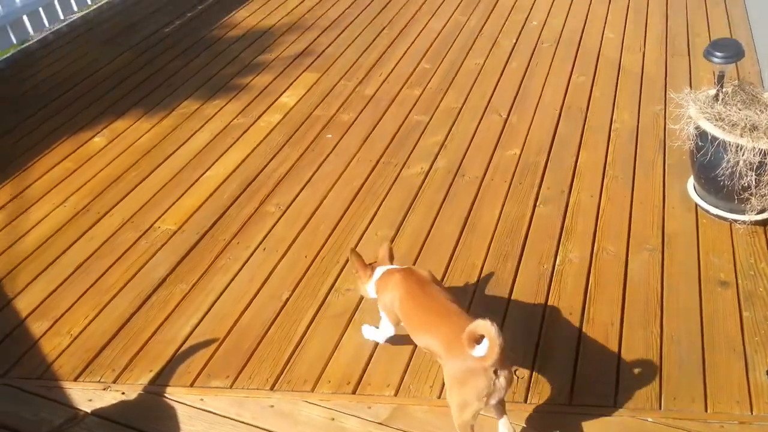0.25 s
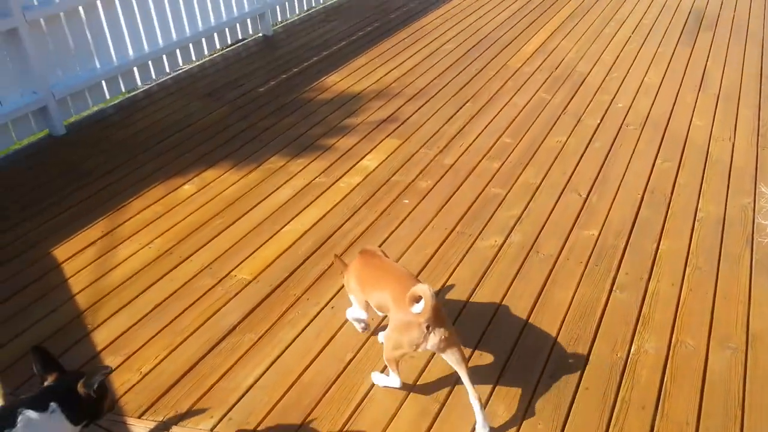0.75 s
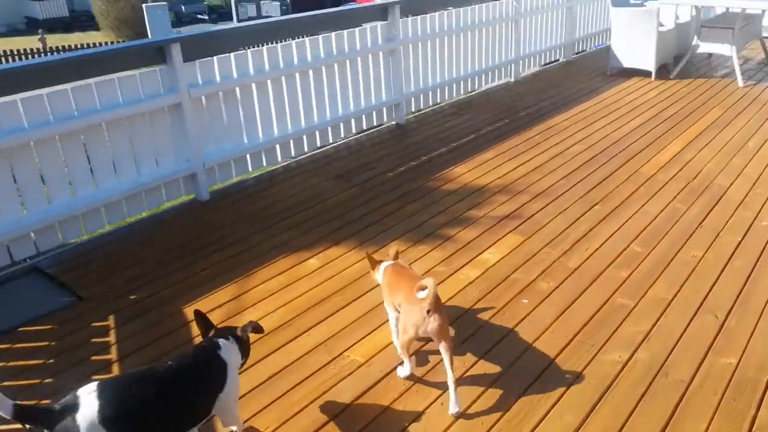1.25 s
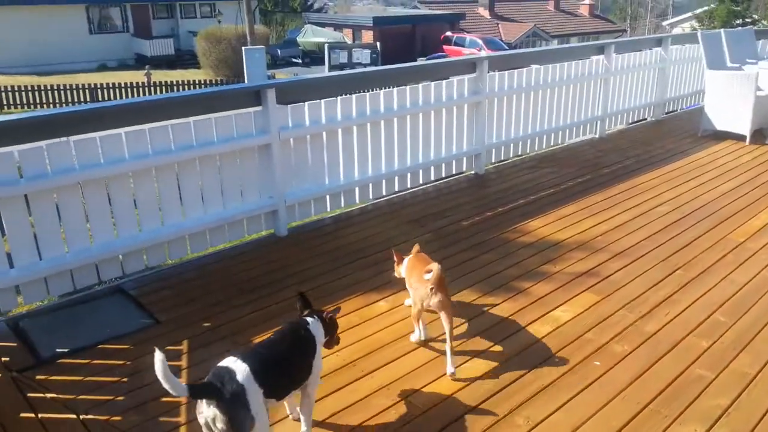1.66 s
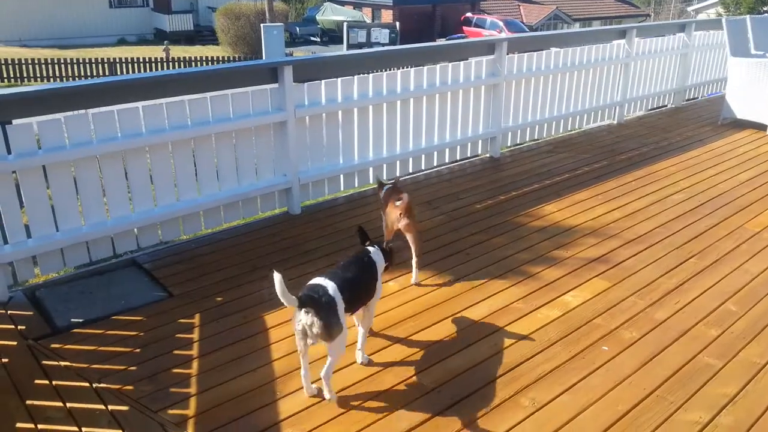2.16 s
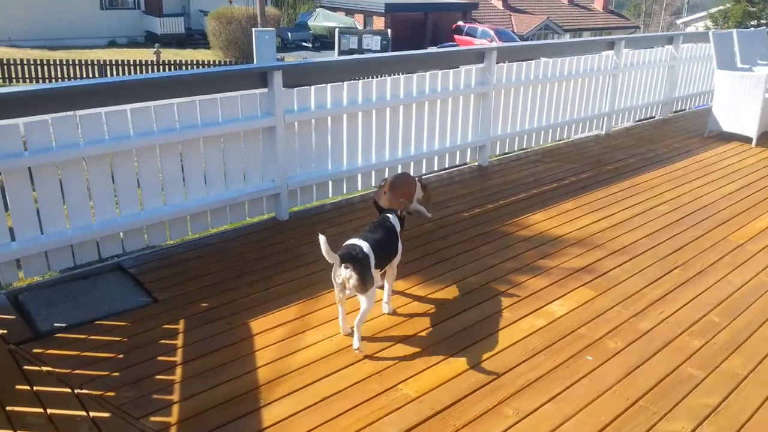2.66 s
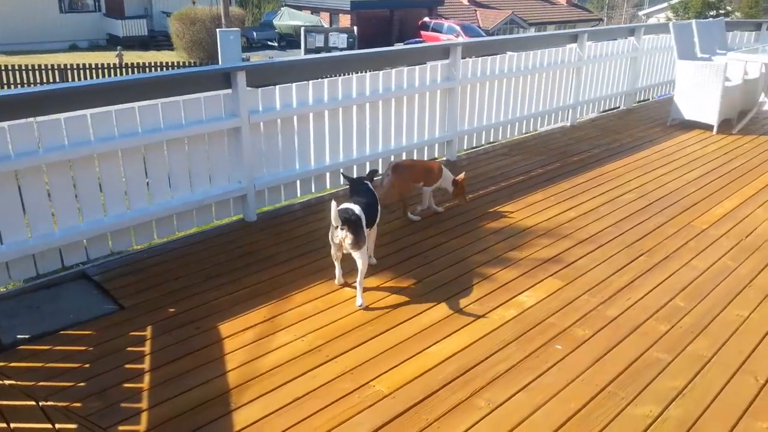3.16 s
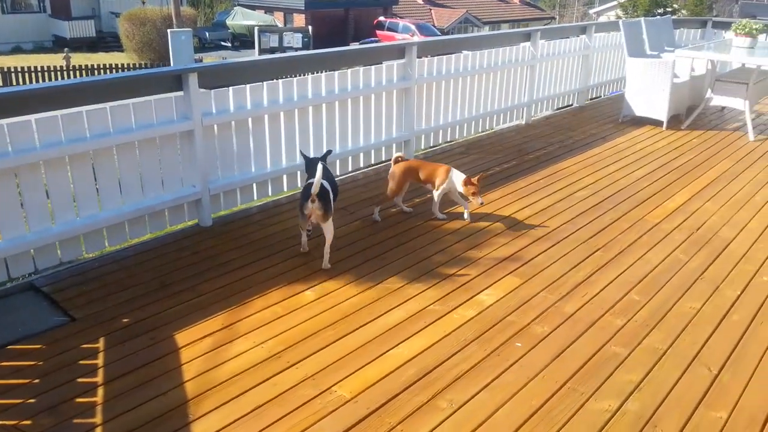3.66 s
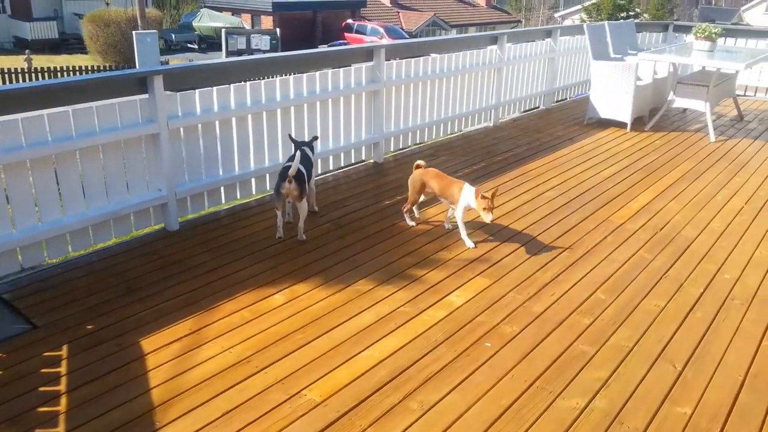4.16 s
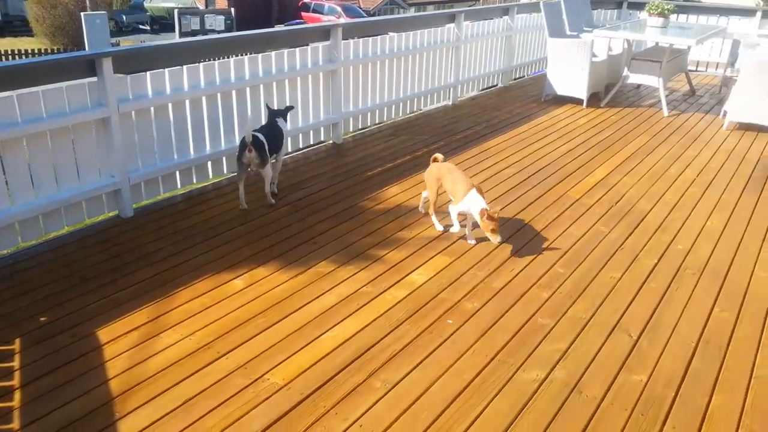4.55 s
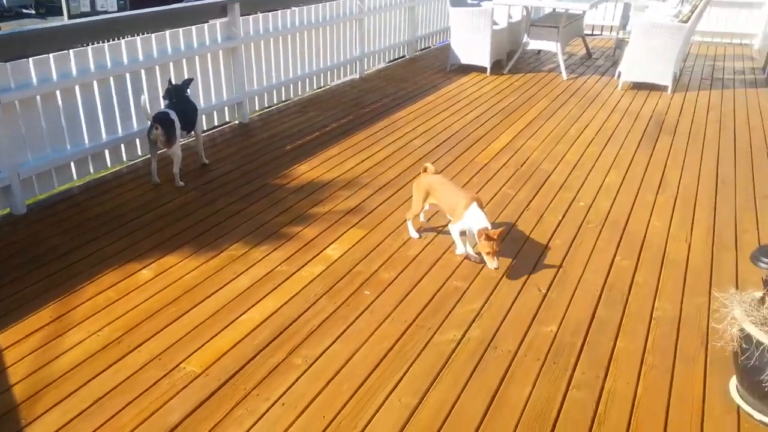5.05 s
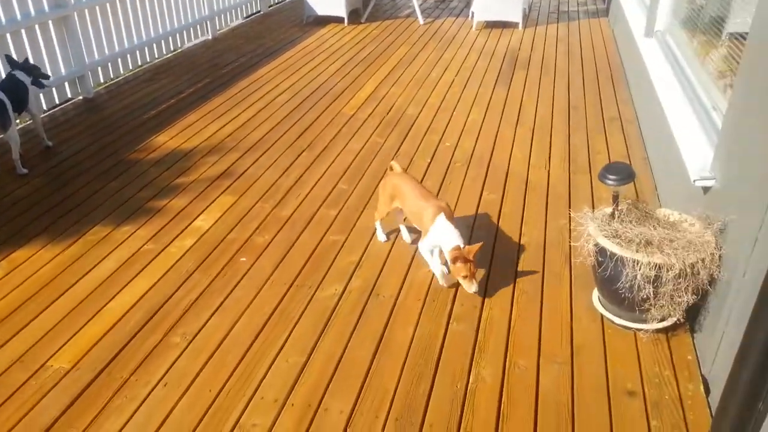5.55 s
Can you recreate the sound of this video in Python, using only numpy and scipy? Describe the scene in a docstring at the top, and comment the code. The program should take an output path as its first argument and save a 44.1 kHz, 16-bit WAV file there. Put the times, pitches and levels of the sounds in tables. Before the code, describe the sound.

Two small dogs walk on an outdoor wooden deck, their claws clicking irregularly with light scuffs and a few soft, hollow thuds. About halfway through, a gust of wind buffets the hand-held microphone. The steps grow sparser and fainter while a small bird quietly whistles a low and a high note in turn. Stronger gusts rumble near the end, over faint distant traffic and a motor hum.

```python
"""A soft puff of wind comes first, then the ticking claws of two small dogs on a wooden deck.
Their toes scuff and the boards knock, echoed briefly by wall and fence. Gusts buffet the hand-held
microphone, mostly its right port (sound opening). Later a small bird whistles two notes in turn.
Faint far traffic and a distant motor hum lie under it all."""
import sys
import numpy as np
from scipy import signal
from scipy.fft import rfft, irfft
from scipy.io import wavfile
from scipy.ndimage import uniform_filter1d

SR = 44100
rng = np.random.default_rng(int(sys.argv[2]) if len(sys.argv) > 2 else 0)


def digitize_waveform(pressure):
    """Quantize a signal to 16-bit integers and store it at the path in sys.argv[1].

    Rows of a 2-D input are taken as channels; values are limited to [-1, 1].
    """
    field = np.atleast_2d(pressure).T
    bounded = np.clip(field, -1, 1)
    quanta = np.round(bounded * 32767).astype(np.int16)
    wavfile.write(sys.argv[1], SR, quanta)


N = 255339
TIME = np.arange(N) / SR
PORT_LAG = 6  # samples by which the left port hears later


def undb(db):
    """Turn decibels into a gain to multiply by."""
    return 10 ** (np.asarray(db) / 20)


def curve(table):
    """Join the (time, value) points of a table into one value per sample."""
    return np.interp(TIME, *np.transpose(table))


def colour(x, points, size=4096):
    """Shape the tone through (f/Hz, level/dB) points; white noise keeps its power."""
    hz, db = np.transpose(points)
    f = np.maximum(np.arange(size // 2 + 1) * SR / size, 1)
    gain = undb(np.interp(np.log(f), np.log(hz), db))
    cepstrum = irfft(np.log(gain))
    cepstrum[1:size // 2] *= 2  # folded forward, so the filter never rings before a hit
    cepstrum[size // 2 + 1:] = 0
    response = irfft(np.exp(rfft(cepstrum)))
    return signal.fftconvolve(np.atleast_2d(x), response[None] / np.linalg.norm(response), axes=-1)[:, :N]


def noise(points):
    """Coloured noise, unrelated at the two ports."""
    return colour(rng.standard_normal((2, N)), points)


def wander(rate):
    """A smooth random wobble of size about 1, with `rate` new values a second."""
    k = int(SR / rate)
    stairs = np.repeat(rng.standard_normal(N // k + 1), k)
    return 1.228 * uniform_filter1d(uniform_filter1d(stairs, k), k)[:N]


def ports(pair, likeness):
    """The left port hears part of what the right one hears, a little later."""
    left = likeness * np.roll(pair[1], PORT_LAG) + np.sqrt(1 - likeness ** 2) * pair[0]
    return np.array([left, pair[1]])


def sides(pan_db):
    """Two gains of mean power 1; the first (left) is pan_db louder."""
    gains = undb(np.array([pan_db, -pan_db]) / 2)
    return (gains / np.sqrt(np.mean(gains ** 2, axis=0))).reshape(2, -1)


def add(out, s, sound):
    """Mix a stereo sound in at s seconds."""
    i = max(int(s * SR), 0)
    out[:, i:i + sound.shape[1]] += sound[:, :max(N - i, 0)]


def bump(t, rise_s, decay_s):
    """A level that grows to 1 at t = 0, then dies away."""
    return np.exp(-np.abs(t) / np.where(t < 0, rise_s, decay_s))


def echo(x, t60, delay):
    """Scattered reflections: few at first, then many, fading by 60 dB in t60 seconds."""
    t = np.arange(SR) / SR
    reflections = rng.standard_normal((2, SR)) * (rng.random((2, SR)) < .05 + 10 * t)
    response = reflections * np.exp(-np.log(1000) * t / t60) * (t > delay)
    response /= np.linalg.norm(response, axis=1, keepdims=True)
    return signal.fftconvolve(x, response, axes=-1)[:, :N]


# tone of the outdoor air: f/Hz, level/dB
AIR_TONE = [(59, -24.5), (100, -6), (317, -4), (367, -2), (425, -3.5), (492, -4.5), (660, -15),
            (885, -12.5), (1630, -32), (2990, -24.5), (12200, -21.5), (14100, -26), (15000, -41)]
# tone of the far traffic: f/Hz, level/dB
TRAFFIC_TONE = [(150, 2), (300, -6), (500, -5), (720, -4.5), (1020, 2.5), (1400, -5.5), (2200, -13),
                (5000, -29), (15000, -66)]
# how the traffic swells and fades: t/s, level/dB
TRAFFIC_LEVEL = [(0, -80.5), (1.2, -89), (2.4, -82.5), (3.3, -76), (4.2, -73.5), (5.1, -88.5), (5.79, -83)]
# the pitches in the motor's hum: f/Hz, level/dB
MOTOR_TONES = [(131.5, -80), (263.5, -78.5), (308, -80.5), (396, -84.5), (437, -78), (643, -95),
               (729, -90.5)]
def outdoors():
    """Still air hisses, far traffic murmurs and a motor hums at a wavering speed."""
    air = undb(-74) * ports(noise(AIR_TONE), likeness=0.78)
    traffic_db = curve(TRAFFIC_LEVEL) + 4.5 + 0.31 * wander(11)
    traffic = undb(traffic_db) * ports(noise(TRAFFIC_TONE), likeness=0.65)
    motor_time = np.cumsum(1 + 0.00716 * wander(8)) / SR
    hum = sum(undb(db + 2.85 * wander(8.4)) * np.sin(2 * np.pi * hz * motor_time)
              for hz, db in MOTOR_TONES)
    return air + traffic + hum * undb(-1)


# the bird's low and high note: length/s, rough start f/Hz, f/Hz it slides toward
BIRD_NOTES = [(0.13, 3530, 3425), (0.23, 5330, 4830)]
# the song, low and high in turn: t/s, level/dB
BIRD_SONG = [(3.44, -70), (3.761, -63), (4.18, -64.5), (4.452, -57.5), (4.855, -59.5), (5.141, -69)]
def bird(settle=0.32, rasp=0.5, rasp_fade=0.31, swell=1.1):
    """Whistled notes start raspy, swell and slide down, smeared by the gardens in between."""
    out, flutter = np.zeros((2, N)), wander(900)
    for k, (s, db) in enumerate(BIRD_SONG):
        length, start_hz, end_hz = BIRD_NOTES[k % 2]
        u = np.arange(int(length * SR)) / (length * SR)  # 0 to 1 through the note
        roughness = rasp * np.exp(-u / rasp_fade) * flutter[int(s * SR):][:len(u)]
        hz = end_hz + (start_hz - end_hz) * (np.exp(-u / settle) + roughness)
        loudness = np.abs(np.sin(np.pi * u ** swell)) ** 0.65
        note = np.sin(2 * np.pi * np.cumsum(hz) / SR) * loudness
        add(out, s, note * undb(db) * sides(pan_db=8))
    return undb(-1.5) * out + undb(-3.5) * echo(out, t60=.44, delay=.008)


# gusts of wind: t/s, time held/s, left level/dB, right level/dB
GUSTS = [(0.0, 0.13, -66, -61), (0.352, 0.31, -63, -55), (0.91, 0.02, -54, -65), (1.964, 0.091, -79, -63),
         (2.297, 0.32, -67.5, -70), (2.79, 0.077, -48.5, -42), (2.931, 0.11, -43.5, -35.5),
         (3.068, 0.0091, -47.5, -47), (3.145, 0.027, -56, -50.5), (4.5, 0.04, -58, -59),
         (4.544, 0.077, -41, -40), (4.685, 0.077, -44.5, -39), (4.84, 0.062, -50.5, -35),
         (5.297, 0.031, -49.5, -51.5), (5.394, 0.034, -40.5, -46), (5.494, 0.28, -49, -35.5),
         (5.689, 0.083, -46, -25.5)]
def gusts(rise_s, fall_s, lull_db=-72.5):
    """Wind level in dB at the two ports: each gust rises, holds and dies back into the lull."""
    power = undb(lull_db) ** 2
    for s, length, left_db, right_db in GUSTS:
        shape = np.exp(np.minimum((TIME - s) / rise_s, 0) + np.minimum((s + length - TIME) / fall_s, 0))
        power = power + (undb([[left_db], [right_db]]) * shape) ** 2
    return 10 * np.log10(power)


# tone of wind rustling about the deck: f/Hz, level/dB
RUSTLE_TONE = [(300, 13), (600, 9.5), (1500, 4.5), (3000, 1), (6000, -3), (9000, -3.5), (15000, -7.5)]
# tone of air rushing past the microphone's housing: f/Hz, level/dB
RUSH_TONE = [(200, -6), (450, 2.5), (720, -1.5), (1020, 2.5), (1400, -7), (2300, -10.5), (5000, -38),
             (15000, -59)]
def breeze():
    """Each gust rustles about the deck and rushes past the housing, swelling slowly."""
    force_db = gusts(rise_s=0.03, fall_s=0.086).mean(axis=0) + 42
    rustle_db = -65 + 0.39 * force_db + 1.6 * wander(22)
    rustle = undb(rustle_db) * ports(noise(RUSTLE_TONE), likeness=0.052) * sides(pan_db=0.5)
    rush_db = -65 + 0.66 * force_db + 2.8 * wander(14)
    return rustle + undb(rush_db) * ports(noise(RUSH_TONE), likeness=1)


# tone of the rumble in light wind: f/Hz, level/dB
LIGHT_WIND_TONE = [(20, -23.5), (45, -2.5), (75, 2.5), (130, -1), (185, -7.5), (280, -20.5), (450, -30.5),
                   (1000, -53), (15000, -100)]
# tone of the rumble in strong wind: f/Hz, level/dB
STRONG_WIND_TONE = [(20, -28), (50, -17), (85, -5.5), (130, 3.5), (185, -1.5), (260, -7.5), (350, -7),
                    (500, -18), (800, -34), (1500, -55.5), (4000, -63), (15000, -105)]
# single swirls of air that hit the right port: t/s, level/dB, half width/s
SWIRLS = [(2.795, -31.5, .003), (2.961, -18, 0.0014), (3.003, -20.5, 0.0015), (4.612, -20, 0.0041),
          (4.840, -24, 0.0013), (4.879, -21.5, 0.0018), (5.639, -12, 0.002), (5.706, -9.5, 0.0013),
          (5.739, -10.5, 0.0018)]
def buffeting(strong_db=-27, blend_db=4, flutter_db=2.5):
    """Air tumbles at each port; faster air makes smaller swirls and so a higher rumble."""
    port_db = gusts(rise_s=0.0091, fall_s=0.026) + flutter_db * wander(35)
    strong = 1 / (1 + np.exp((strong_db - port_db) / blend_db))  # 0 in light wind, 1 in strong
    rumble = np.sqrt(1 - strong) * noise(LIGHT_WIND_TONE) + np.sqrt(strong) * noise(STRONG_WIND_TONE)
    rumble /= np.sqrt(uniform_filter1d(rumble ** 2, size=3000, axis=-1))  # even out its level
    stir = 1 / (1 + np.exp((-70.5 - port_db) / 3))  # lulls hardly stir the ports
    out = rumble * undb(port_db + 1.5) * stir
    for s, db, half_width in SWIRLS:
        u = np.arange(-SR // 32, SR // 32) / SR / half_width
        pop = -np.sin(1.74 * u) * np.exp(-u * u / 4)
        add(out, s - 1 / 32, pop * undb([[db - 25], [db - 2]]))
    return out


# footfalls: t/s, tick level/dB, scuff level/dB, knock level/dB, that spot's ring f/Hz, brightness
FOOTFALLS = [(0.3732, -60, -52.5, -59.5, 1770, -5), (0.3898, -24, -54, -60, 2410, 5.5),
             (0.5328, -33.5, -50.5, -53, 2590, 0.5), (0.5356, -27.5, -47, -50.5, 2680, 0),
             (0.58, -59, -57.5, -61, 2410, -8), (0.677, -61, -53.5, -74, 2540, -0.5),
             (0.6974, -37, -52, -51, 2450, -1), (0.9126, -39, -53, -59, 2110, -2),
             (0.9231, -40, -55, -59, 2130, -6), (0.9344, -24, -53, -50, 1750, 1),
             (1.1671, -48.5, -58.5, -57.5, 2310, 1.5), (1.2548, -51.5, -63.5, -84, 980, 18),
             (1.3148, -34, -50, -56, 2150, 1), (1.451, -51, -62, -65, 2440, -3),
             (1.494, -53, -56.5, -76, 2100, -0.5), (1.5676, -49, -54.5, -55.5, 2460, -1.5),
             (1.6322, -58, -69.5, -77, 1570, -1), (1.675, -43, -56.5, -63, 1950, 3),
             (1.7201, -50.5, -54, -57.5, 2330, -2), (1.79, -58, -55, -56, 2600, 1),
             (1.8095, -43.5, -54.5, -53.5, 2600, -0.5), (1.894, -40, -58.5, -69, 1214, 2),
             (1.937, -69, -63.5, -63, 1635, -1.5), (2.0403, -50, -58.5, -60, 1990, -0.5),
             (2.17, -53, -58, -59.5, 2690, -4.5), (2.2532, -51, -63, -65, 1065, -22),
             (2.2869, -53.5, -53.5, -59, 1980, -13), (2.3005, -46, -59.5, -68, 2550, -15),
             (2.453, -57, -55.5, -45.5, 2560, -28), (2.5315, -53.5, -69, -56.5, 2100, -20),
             (2.5663, -56, -54, -57, 2280, -9), (2.5988, -57, -57.5, -61, 2690, -1),
             (2.6476, -30.5, -45, -41.5, 1540, -3), (2.6934, -50, -59.5, -66, 1880, -7),
             (2.7257, -40, -50.5, -54.5, 1913, -2), (2.8289, -32.5, -38.5, -48, 2730, 0),
             (2.9464, -56, -70, -56.5, 1540, -23), (2.9737, -52.5, -68, -56.5, 1480, -24),
             (2.9962, -59, -63.5, -51, 1495, -18), (3.3373, -56, -65, -69, 946, 0),
             (3.413, -44, -56, -58, 1684, -2.5), (3.5184, -54, -63.5, -67, 1740, -10),
             (3.5951, -35.5, -51, -46.5, 2690, 2), (3.7179, -44, -53, -74, 1240, 4.5),
             (3.8147, -53, -61, -64.5, 1520, -2.5), (3.894, -44, -54, -54, 1650, -9.5),
             (4.0361, -57, -62, -67, 970, -2.5), (4.1657, -62, -64, -68, 970, 2),
             (4.259, -54, -65, -66, 1123, -2), (4.274, -62, -61, -61, 1990, -8),
             (4.683, -45.5, -56.5, -69, 1140, 2), (5.3044, -74, -65.5, -68.5, 1084, -1),
             (5.5193, -71, -67, -66, 1073, -13), (5.755, -66, -57.5, -61, 2450, -10)]
# where the paws are: t/s, left minus right level/dB
PAW_PATH = [(0.39, -3), (0.55, -1), (0.95, -5.5), (1.3, -1.5), (2.8, -2), (3.5, 1), (5.5, 1.5)]
def contacts(claw_gap_s=0.0058, second_claw_db=-9, touch_count=8, trot_s=5.4):
    """List two claws per footfall and some random light touches, adding a left-right column."""
    rows, touches = [], rng.random((touch_count, 2))
    path, chance = np.transpose(PAW_PATH), rng.standard_normal((len(FOOTFALLS), 2))
    for (s, *levels, hz, brightness), (late, aside) in zip(FOOTFALLS, chance):
        pan_db = np.interp(s, *path)
        second_s = s + claw_gap_s * np.exp(0.2 * late)
        rows.append((s, *levels, hz, brightness, pan_db))
        rows.append((second_s, *np.add(levels, second_claw_db), hz, brightness, pan_db + 5 * aside))
    for when, force in touches:
        s = when * trot_s
        levels = np.add((-65.5, -75.5, -78), 3 * (2 * force - 1))  # tick, scuff, knock
        rows.append((s, *levels, 1298, 1, np.interp(s, *path)))
    return rows


# paws that put weight on a board close by: t/s, level/dB
HEAVY_STEPS = [(0.389, -51), (0.528, -51.5), (0.624, -56), (.7, -61.5), (0.917, -52), (1.316, -55.5),
               (2.647, -52)]
# tone of the bending deck: f/Hz, level/dB
THUD_TONE = [(60, -6), (130, 0), (180, -5.5), (245, -2.5), (340, -2), (440, 1.5), (560, -8), (700, -6.5),
             (900, -16.5), (1500, -19), (4000, -46), (12000, -83)]
def thuds():
    """The deck bends under a paw with a soft hollow thud."""
    push = sum(undb(db) * bump(TIME - s, rise_s=0.012, decay_s=0.033) for s, db in HEAVY_STEPS)
    return push * ports(noise(THUD_TONE), likeness=0.8) * undb(-2)


# tone of a paw pad brushing the wood: f/Hz, level/dB
PAD_TONE = [(100, 6.5), (250, 5.5), (450, 3.5), (750, -1.5), (1100, 6.5), (1600, 1.5), (2500, 4.5),
            (4000, -2), (7000, -2.5), (8500, -5), (12000, -3), (15000, -20)]
def pads(hits, soft_db=-60, force_share=0.66):
    """Around each contact the pad brushes the grain; it varies less in strength than the claws."""
    power = np.zeros((2, N))
    t = np.arange(-SR // 10, SR // 5) / SR
    for s, tick_db, scuff_db, _, _, _, pan_db in hits:
        rise_s = 0.017 * undb(-.6 * max(tick_db - scuff_db - 6, 0))
        press = bump(t, rise_s, decay_s=0.025)
        gain = undb(soft_db + force_share * (scuff_db - soft_db) - 2)
        add(power, s + t[0], (gain * press * sides(.5 * pan_db)) ** 2)
    return np.sqrt(power) * undb(3.6 * wander(500)) * ports(noise(PAD_TONE), likeness=0.47)


# the pitches a deck board rings at: f/Hz, level/dB, time to fade by 60 dB/s
BOARD_RINGS = [(241, -12.5, 0.2), (434, -16, 0.12), (535, -14, 0.072), (875, -7.5, 0.15), (1056, -3, 0.061),
               (1248, -10.5, 0.098), (1472, -1.5, 0.085), (1640, 6, 0.039), (1900, -8, 0.082),
               (2176, 2, 0.046), (2390, 1.5, 0.079)]
def boards(hits, detune=0.036, spread_db=4, main_db=2.5, ring_cycles=90):
    """Every contact rings the boards, along with the main pitch of the spot that was hit."""
    out, t = np.zeros((2, N)), np.arange(SR // 8) / SR
    hz, db, t60 = np.transpose(BOARD_RINGS)[:, :, None]
    attack = 1 - np.exp(-t / 0.00057)
    for s, _, _, knock_db, spot_hz, _, pan_db in hits:
        pitch, strength, left_phase = rng.standard_normal((3, len(BOARD_RINGS), 1))
        gain = undb(db + spread_db * strength)
        gain /= np.linalg.norm(gain)
        rings = gain * np.exp((2j * np.pi * hz * (1 + detune * pitch) - np.log(1000) / t60) * t)
        # wood loses a little on every swing, so a high ring dies sooner
        main = undb(main_db) * np.exp((2j * np.pi - np.log(1000) / ring_cycles) * spot_hz * t)
        rings = np.vstack([rings, main]) * np.exp(2j * np.pi * rng.random((len(BOARD_RINGS) + 1, 1)))
        left = (rings * np.exp(.7j * np.vstack([left_phase, 0]))).imag.sum(0)
        pair = np.array([np.pad(left, (PORT_LAG, 0))[:len(t)], rings.imag.sum(0)])
        add(out, s - .0005, pair * attack * undb(knock_db + 4.5) * sides(.5 * pan_db))
    return out


# tone of a claw on wood: f/Hz, level/dB
CLAW_TONE = [(300, -14.5), (700, -11), (1500, -7), (2400, 2.5), (3300, 0), (4500, 2), (5800, 0), (7000, -1),
             (8200, -9.5), (10000, -11), (12000, -29), (15000, -38)]
def claws(hits, tick_decay_s=0.00099, grit_db=3, split_hz=5400, horn_hz=4700):
    """A claw snaps onto the board in the middle of a short gritty scuff of the toes."""
    out, lead = np.zeros((2, N)), int(.03 * SR)
    t = (np.arange(3 * lead) - lead) / SR
    tick_shape = (t >= 0) * np.exp(-np.abs(t) / tick_decay_s)
    low_pass = signal.butter(3, split_hz, fs=SR)
    for s, tick_db, scuff_db, _, _, brightness, pan_db in hits:
        snap, rub = rng.standard_normal((2, 2, len(t)))
        grit = undb(grit_db * np.repeat(rng.standard_normal(len(t)), 24)[:len(t)])
        grit /= np.sqrt(np.mean(grit ** 2))
        tick = ports(snap, likeness=0.49) * tick_shape
        tick *= np.linalg.norm(tick_shape) / np.linalg.norm(tick, axis=1, keepdims=True)
        # a claw that lands squarely hardly slides beforehand
        rise_s = 0.0059 * undb(-.6 * max(tick_db - scuff_db - 2.5, 0))
        scuff = ports(rub, likeness=0.28) * grit * bump(t, rise_s, decay_s=0.0064)
        contact = undb(tick_db + 2) * tick + undb(scuff_db + 0.5) * scuff
        # the hard horn of each claw rings briefly at three pitches of its own
        pitches = horn_hz * np.array([.66, .93, 1.25]) * np.exp(0.11 * rng.standard_normal(3))
        horn = sum(signal.lfilter(*signal.iirpeak(hz, Q=12, fs=SR), contact) for hz in pitches)
        contact += undb(3) * horn
        # a hard tip sounds bright, a glancing one dull
        low = signal.filtfilt(*low_pass, contact)
        treble, bass = sides(2.15 * brightness + 4)[:, 0]
        add(out, s - lead / SR, (bass * low + treble * (contact - low)) * sides(pan_db))
    return colour(out, CLAW_TONE)


def scene():
    """The dogs' steps and their short echoes, mixed with wind, bird and background."""
    hits = contacts()
    steps = claws(hits) + boards(hits) + pads(hits) + thuds()
    near = undb(-9) * echo(steps, t60=0.034, delay=0.0023)
    far = undb(-17) * echo(steps, t60=0.086, delay=0.0093)
    return steps + near + far + buffeting() + breeze() + bird() + outdoors()


def record(dry):
    """The recorder thins the rumble below 28 Hz and cuts the treble above 14900 Hz."""
    thinned = signal.sosfilt(signal.butter(1, 28, "high", fs=SR, output="sos"), dry)
    return signal.sosfilt(signal.ellip(10, .2, 70, 14900, fs=SR, output="sos"), thinned)


dry = scene()
out = record(dry)
digitize_waveform(out)
```